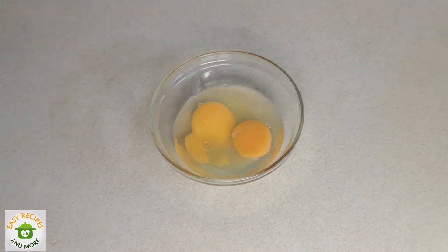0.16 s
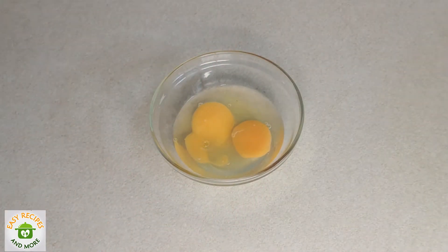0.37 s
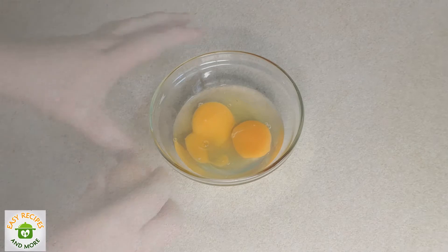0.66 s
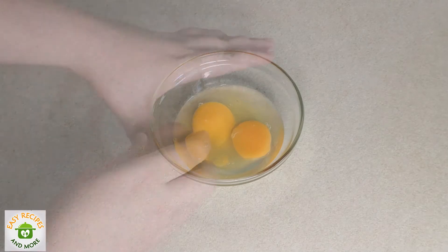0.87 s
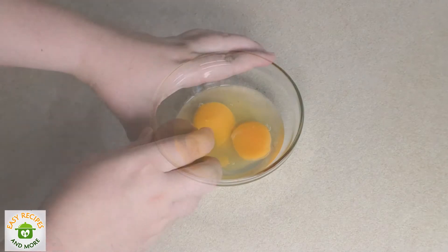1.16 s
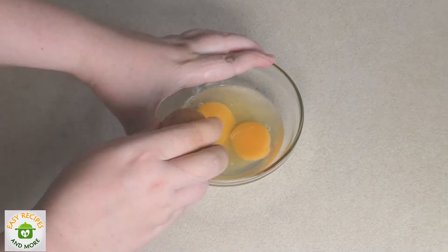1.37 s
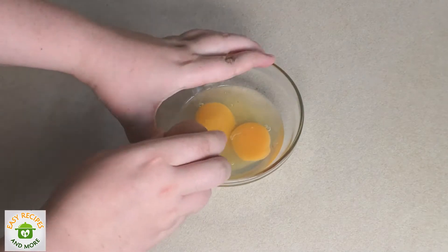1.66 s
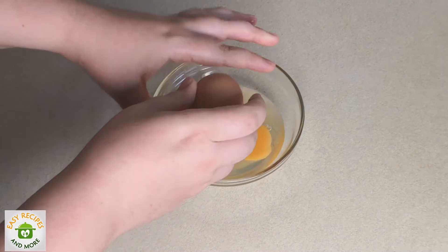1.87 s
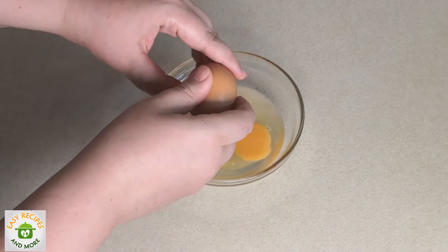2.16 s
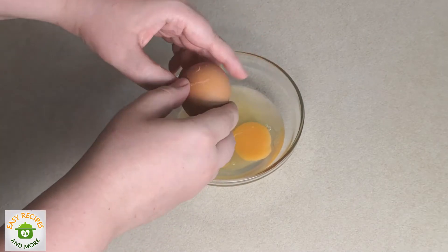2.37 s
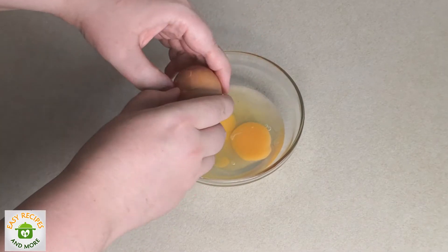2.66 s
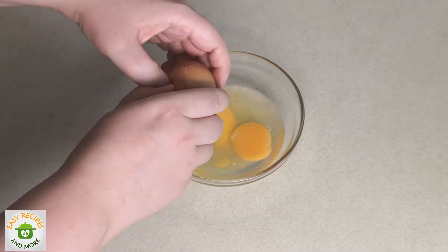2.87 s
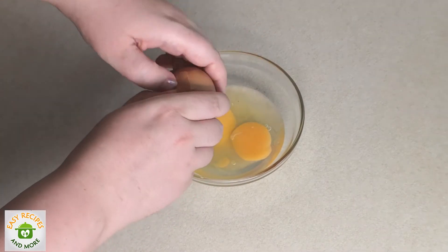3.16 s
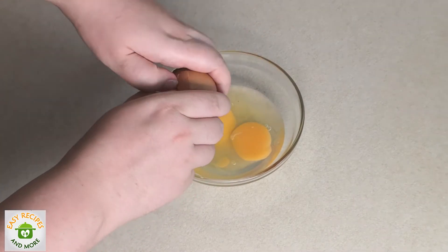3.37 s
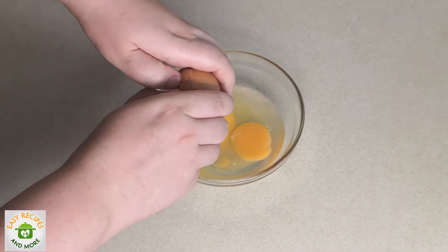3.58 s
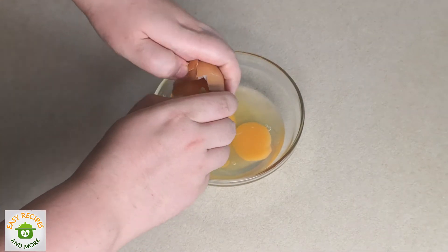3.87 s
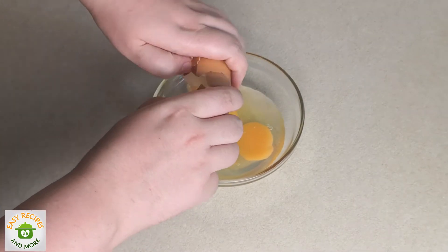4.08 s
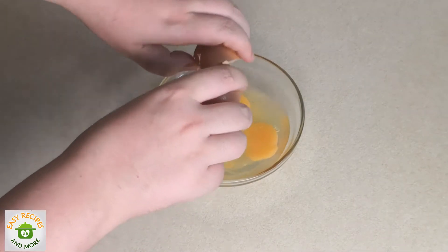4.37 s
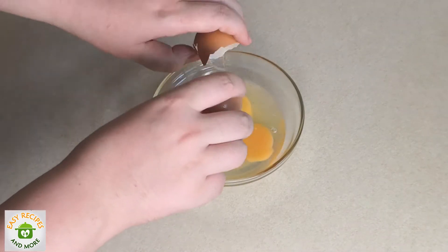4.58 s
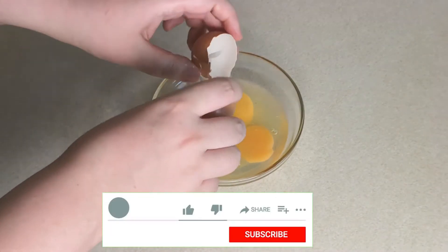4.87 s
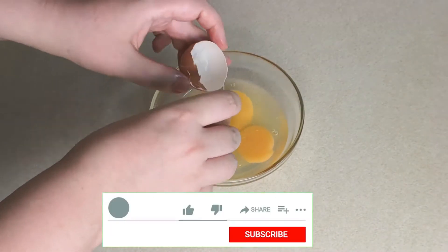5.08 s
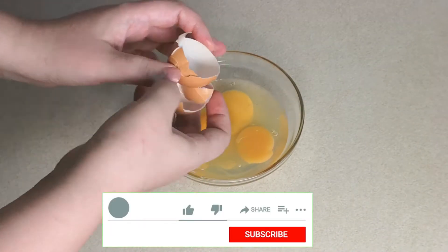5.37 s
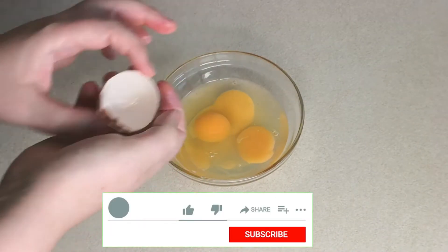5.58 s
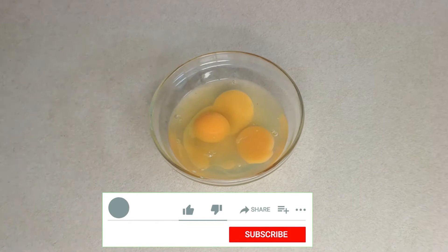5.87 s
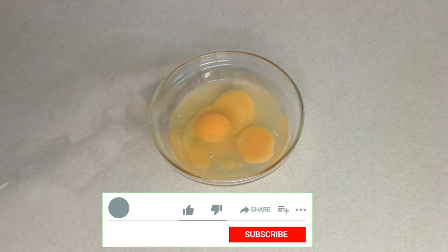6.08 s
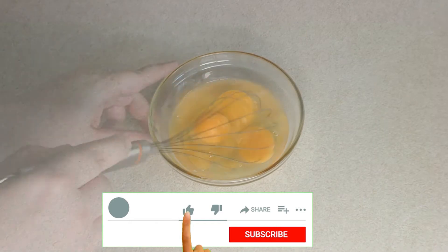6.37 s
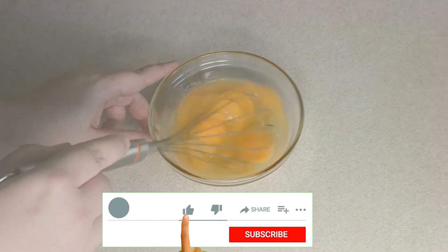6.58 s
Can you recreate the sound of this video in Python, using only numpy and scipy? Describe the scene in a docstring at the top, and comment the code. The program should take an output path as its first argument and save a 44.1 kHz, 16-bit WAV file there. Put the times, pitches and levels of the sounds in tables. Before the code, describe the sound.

Four hollow egg knocks ring a glass bowl in a small kitchen, then brittle shell snaps, a wet plop, and faint wire scrapes in egg.

```python
"""Fingers slide softly over shell and glass; then an egg is knocked four times on the rim of a glass bowl.
Each blow is noise of breaking shell, ringing rim modes, and a thud with a low shudder that soon breaks off.
Thumbs snap the shell open, its halves touch, wet egg crackles and slips, and a wire whisk starts through it.
Snaps excite shell resonances; sparse random clicks make rubs and wet crackle; rising sines make bubbles.
Two close microphone ports hear it in a small hard kitchen, over rumble, a low hum and faint hiss."""
import sys
import numpy as np
from scipy import signal
from scipy.fft import rfft, irfft
from scipy.io import wavfile
from scipy.ndimage import uniform_filter1d

SR = 44100
rng = np.random.default_rng(int(sys.argv[2]) if len(sys.argv) > 2 else 0)


def master(y):
    """Save y as 16-bit WAV."""
    cut = np.clip(np.atleast_2d(y).T, -1, 1)
    pcm = np.round(cut * 32767)  # scale
    wavfile.write(sys.argv[1], SR, pcm.astype(np.int16))


N = 297234
T = np.arange(N) / SR
AGE = T[:SR]  # s since an event began; every event is one second long
FREQ = np.arange(SR // 2 + 1) + 1e-3  # Hz, kept off zero for the logarithm

# egg on the rim; the dB columns are reference levels for the parts of each blow:
# start_s, knock_db, thud_db, crunch_db, rim_1_db, rim_2_db, rim_3_db, hollow_db, give_way_s
BLOWS = [(1.028, -23, -34.5, -61, -44.5, -49.5, -63.5, -32, 0.011),
         (1.367, -12, -30, -29.5, -28, -34, -31.5, -21, 0.0043),
         (1.539, -19.5, -31, -24.5, -33, -32, -35.5, -39, 0.0035),
         (1.705, -31, -30, -28.5, -34.5, -40, -30.5, -46, 0.0023)]
# rim modes of the glass, each a close pair: pitch_hz, split_hz, t60_s, level_db
RIM_MODES = [(2075, 40, 0.67, -10), (3730, 85, 0.12, -5.5), (5774, 70, 0.27, -12.5)]
# resonances heard in the body of the knock, coloured by the room:
# pitch_hz, level_db, t60_s (held to 0.45 s at most)
KNOCK_BODY = [(253, -27.5, 0.54), (553, -52.5, 5.0), (702.4, -27.5, 0.42), (885, -24, 0.54),
              (1071, -25.5, 0.73), (1120, -19.5, 0.054), (1155, -11, 0.33), (1248, -30.5, 0.63),
              (1386, -2.5, 0.067), (1510, -25, 0.091), (1450, -35, 0.85), (1690, -18.5, 0.26),
              (1770, -37, 0.7), (1980, -18.5, 0.11), (1998, -31, 0.51), (2090, -38.5, 2.3),
              (2070, -41.5, 1.3), (2150, -34.5, 0.31)]
# dent in the eggshell, which booms under each blow: pitch_hz, t60_s, level_db
DENT_MODES = [(1285, 0.023, 0.5), (980, 0.0064, -9.5)]
# colour of the egg's knock: pitch_hz, level_db
KNOCK = [(150, -2.5), (280, -4.5), (400, -9), (490, -1.5), (560, -1.5), (700, -2), (800, 3), (930, 4.5),
         (1200, -0.5), (1580, 0), (1950, -2), (2400, 0.5), (3000, -11.5), (4500, -17), (8000, -28),
         (13000, -68.5)]
# colour of the thud on the counter: pitch_hz, level_db
THUD = [(30, -50.5), (48, -33), (64, -18), (80, -18), (102, 7.5), (135, 3), (175, -15), (215, -8.5),
        (300, -16.5), (600, -28.5), (4000, -79.5)]
# colour of the crunching shell: pitch_hz, level_db
CRUNCH = [(150, -44.5), (800, -24.5), (2500, 0), (4500, -4), (6400, -4.5), (7400, 0.5), (9300, -8.5),
          (11000, -21), (14500, -28.5)]
BODY_DB, SHUDDER_DB = -13, 3.5  # body relative to knock_db, shudder relative to thud_db


def blows():
    """The shell caves in on the rim and the glass rings; a low shudder follows and soon breaks off."""
    out = np.zeros(N)
    for start_s, knock_db, thud_db, crunch_db, *rim_db, hollow_db, rise_s in BLOWS:
        push = crush(rise_s, t60=0.04)
        sound = hit(colour(push, KNOCK), knock_db - 4.0)
        for hz, t60, db in DENT_MODES:
            sound += hit(resonance(push, hz, t60), hollow_db + db)
        sound += hit(colour(crush(rise_s / 2, t60=0.027), CRUNCH), crunch_db)
        sound += hit(colour(fracture(t60=.04, trail=.4), THUD), thud_db)
        sound += hit(shudder(), thud_db + SHUDDER_DB)

        # the modes gather their energy while the egg is pushing
        swell = 1 - np.exp(-AGE / max(rise_s / 2, 1e-4))
        body = np.zeros(SR)
        for hz, db, t60 in KNOCK_BODY:
            polarity = rng.choice([-1, 1])
            body += polarity * undb(db) * ring(AGE == 0, hz, min(t60, .45))
        sound += hit(body * swell, knock_db + BODY_DB)

        for (hz, split_hz, t60, db), struck_db in zip(RIM_MODES, rim_db):
            pair = ring(AGE == 0, hz, t60) + .8 * ring(AGE == 0, hz + split_hz, t60)
            sound += hit(pair * swell, struck_db + db)
            # the egg pressed on the rim chokes the first flash of each mode
            flash = resonance(push, hz + split_hz / 2, .01)
            sound += hit(flash, struck_db + 3)
        add(out, start_s, sound)
    # so small a body radiates almost no deep bass
    return signal.sosfilt(signal.butter(6, 62, "high", fs=SR, output="sos"), out)


# low resonances after a blow: pitch_hz, t60_s (rattle; the free ring gets twice this), level_db
SHUDDER = [(100, .25, 0), (128, .1, -7), (160, .08, -9), (217, .12, -11), (270, .06, -12)]
# the low rumble after a blow fades slowly, then drops away quickly
SHUDDER_T60_S, SHUDDER_DROP_S = .38, .14
RATTLE_DB = 2  # uneven rattle, relative to the low ring


def shudder():
    """A low ring and an uneven rattle, which break off together."""
    noise = rng.standard_normal(2 * SR)
    fade = undb(-60 * AGE / SHUDDER_T60_S) / (1 + (AGE / SHUDDER_DROP_S) ** 20)
    out = np.zeros(SR)
    for hz, t60, db in SHUDDER:
        out += hit(ring(AGE == 0, hz, 2 * t60) * fade, db)
        rattle = resonance(noise, hz, t60)[SR:]  # the first second only builds it up
        out += hit(rattle * fade, db + RATTLE_DB)
    return out


# shell snapping under the thumbs; shard_db is the reference for snap, shard and splinters:
# start_s, cavity_db, cavity_hz, shard_hz, shard_db
CRACKS = [(2.635, -68, 2165, 7540, -58), (3.383, -85, 2070, 6820, -54.5), (3.523, -71, 2510, 4060, -58.5),
          (3.537, -76, 2350, 4130, -59), (3.7194, -61, 2780, 7000, -58.5), (3.812, -62, 2780, 4280, -49),
          (3.846, -25.5, 2300, 7800, -41.5), (3.8668, -26, 2200, 7450, -32), (3.876, -33, 2330, 7200, -78),
          (3.892, -35.5, 2360, 7000, -52), (4.0677, -43.5, 2010, 4940, -46),
          (4.105, -56.5, 2200, 7460, -51), (4.119, -49.5, 2180, 7830, -52.5),
          (4.1441, -41, 2274, 6860, -68), (4.174, -56, 1840, 7100, -55.5), (4.2275, -74, 2250, 6760, -59),
          (4.372, -62.5, 2670, 6650, -57), (4.597, -61, 2500, 6400, -62), (4.6034, -47, 2334, 7000, -47.5),
          (4.6289, -49.5, 2840, 7300, -49.5), (4.6643, -42.5, 2890, 5680, -25)]
# emptied half shells touching: start_s, cavity_db, shard_db
TAPS = [(4.948, -67, -71), (4.968, -68, -75), (5.263, -65.5, -78), (5.4474, -37, -51.5), (5.505, -67, -52),
        (5.742, -62.5, -76), (5.775, -60.5, -74)]
TAP_CAVITY_HZ, TAP_SHARD_HZ = 2300, 5670
CRACK_RING_DB, TAP_RING_DB = -12.5, 2.5  # clear ring of the shell, relative to its cavity
CRACK_TRAIL, TAP_TRAIL = 0.71, 0.4  # small breaks after the first one, as a share of it


def cracks():
    """The shell breaks open piece by piece; then its empty halves touch, always at the same pitch."""
    out = np.zeros(N)
    for start_s, cavity_db, cavity_hz, shard_hz, shard_db in CRACKS:
        add(out, start_s, shell(cavity_db, cavity_hz, shard_db, shard_hz, CRACK_RING_DB, CRACK_TRAIL))
    for start_s, cavity_db, shard_db in TAPS:
        add(out, start_s, shell(cavity_db, TAP_CAVITY_HZ, shard_db, TAP_SHARD_HZ, TAP_RING_DB, TAP_TRAIL))
    return out


# colour of the hollow half shell: multiple_of_cavity_hz, level_db
CAVITY = [(.1, -83), (.25, -14), (0.452, -21), (.7, -6.5), (0.898, 9.5), (1.069, 10), (1.248, 3),
          (1.6, -5.5), (2.398, -48.5), (5, -63.5)]
# bright snap of shell, also the colour of fine scratches, spray and wires: pitch_hz, level_db
SNAP = [(60, -31.5), (200, -13.5), (800, -39), (1600, -11), (3000, -1), (4200, 1.5), (6000, 3), (7400, 8),
        (9500, 0.5), (11500, -11), (14500, -26)]
SHELL_SPLIT, SHELL_T60_S = 0.063, .013  # the uneven cup has two modes, this share below and above its pitch


def shell(cavity_db, cavity_hz, shard_db, shard_hz, ring_db, trail):
    """A snap rings the hollow half shell and the loose shard; shards of higher pitch snap brighter."""
    snap = fracture(t60=0.036, trail=trail)
    brightness = np.sqrt(shard_hz / 7000)
    snap_colour = [(brightness * hz, db) for hz, db in SNAP]
    cavity_colour = [(k * cavity_hz, db) for k, db in CAVITY]
    sound = hit(colour(snap, snap_colour), shard_db - 5.5)
    sound += hit(colour(snap, cavity_colour), cavity_db)
    cup = sum(resonance(snap, cavity_hz * (1 + side * SHELL_SPLIT), SHELL_T60_S) for side in (-1, 1))
    sound += hit(cup, cavity_db + ring_db)
    shard = resonance(snap, shard_hz, .004)
    sound += hit(shard, shard_db - 2.0)
    # splinters still held by the membrane tick on after the break
    splinters = grains(rate=250, spread_db=4) * undb(-60 * AGE / .3)
    return sound + hit(colour(splinters, SNAP), shard_db - 14.5)


# surges of egg, slipping out of the shell or pushed by the whisk:
# start_s, swell_s, squelch_db, spray_db, slosh_db
SURGES = [(3.863, 0.0075, -46.5, -40, -59), (3.91, 0.063, -65, -58.5, -81), (4.064, 0.0043, -82, -52, -73),
          (4.101, 0.041, -66.5, -60, -98), (6.41, 0.083, -86, -70.5, -89),
          (6.511, 0.0073, -59.5, -58.5, -81), (6.589, 0.041, -74, -57.5, -63),
          (6.635, 0.021, -64, -56, -71)]
# colour of the bursting films: pitch_hz, level_db
SQUELCH = [(300, -10.5), (700, -12.5), (1400, -15), (2200, -11), (4000, -9.5), (12000, -62)]
# colour of the moving bulk: pitch_hz, level_db
SLOSH = [(40, -28.5), (100, -9), (140, 1), (210, 10), (400, -22.5), (1000, -23), (8000, -56)]
# air pockets popping in the egg: start_s, level_db, pitch_hz (where the glide begins), t60_s
BUBBLES = [(4.078, -54, 1170, 0.04), (4.108, -56, 1250, 0.045), (4.135, -57, 1330, 0.04),
           (4.176, -60, 1400, .03), (4.197, -60, 1600, 0.035), (6.519, -54, 1450, 0.03),
           (6.595, -53, 1420, 0.025), (6.636, -51, 2800, .015), (6.663, -56, 1550, 0.019),
           (6.648, -52, 520, .04), (6.659, -52, 540, .04), (6.671, -55, 520, .03)]
SURGE_RELEASE_S, SURGE_RELEASE_PER_SWELL = 0.063, 0.83  # a slow surge also dies away slowly
SLOSH_LAG_S, SLOSH_RELEASE_S = 0.017, 0.34  # the bulk of the egg peaks later and fades more slowly


def liquid():
    """Sticky films burst in a fine crackle over a dull slosh; larger air pockets ring and rise in pitch."""
    out = np.zeros(N)
    for start_s, swell_s, squelch_db, spray_db, slosh_db in SURGES:
        films = grains(rate=1200, spread_db=3.5)
        drops = grains(rate=3000, spread_db=4)
        squelch = undb(squelch_db) * unit(colour(films, SQUELCH))
        spray = undb(spray_db) * unit(colour(drops, SNAP))
        release_s = SURGE_RELEASE_S + SURGE_RELEASE_PER_SWELL * swell_s
        add(out, start_s, (squelch + spray) * stroke(swell_s, release_s))
        slosh = undb(slosh_db) * unit(colour(rng.standard_normal(SR), SLOSH))
        add(out, start_s, slosh * stroke(swell_s + SLOSH_LAG_S, SLOSH_RELEASE_S))
    for start_s, db, hz, t60 in BUBBLES:
        rising_hz = hz * (1 + 0.2 * np.minimum(AGE / t60, 1))
        phase = 2 * np.pi * np.cumsum(rising_hz) / SR
        add(out, start_s, hit(np.sin(phase) * stroke(2 / hz, t60), db))
    return out


# whisk wires scraping on the glass: start_s, level_db (reference for ring and scrape), pitch_hz
WIRES = [(6.515, -52.5, 7250), (6.6134, -36.5, 5560), (6.626, -59, 5400), (6.684, -45, 4000)]


def whisk():
    """Wires skid briefly on the glass, choked at once by the egg."""
    out = np.zeros(N)
    for start_s, db, hz in WIRES:
        skid = crush(rise=0.0013, t60=0.0064)
        wire_ring = hit(resonance(skid, hz, 0.0032), db - 5.5)
        scrape = hit(colour(skid, SNAP), db - 15.5)
        add(out, start_s, wire_ring + scrape)
    return out


# fingers sliding on shell and glass, one stroke a row: start_s, swell_s, rub_db, scratch_db, rub_hz
RUBS = [(0.15, .025, -70, -77, 2100), (0.315, 0.033, -69.5, -66, 2090), (0.512, 0.17, -65.5, -74, 1516),
        (0.66, 0.041, -64, -67, 1566), (0.8, 0.064, -88.5, -74, 1837), (2.958, .025, -72, -70.5, 2200),
        (3.02, 0.043, -72.5, -83.5, 1250), (3.203, 0.0093, -65.5, -85, 1582),
        (3.339, 0.01, -78, -107, 1540), (5.53, 0.038, -75, -68, 2170), (5.73, 0.094, -73, -78, 2007),
        (5.97, 0.049, -68, -78, 1823)]
# colour of the dull rub: multiple_of_rub_hz, level_db
RUB = [(0.124, -43), (0.559, -24.5), (0.998, 1), (1.349, -4), (2.06, -18.5), (5.001, -34.5)]
RUB_RELEASE_S, RUB_RELEASE_PER_SWELL = 0.055, 1  # a slow stroke also lets go slowly


def fingers():
    """Skin catches and slips on the rough shell, stroke by stroke."""
    out = np.zeros(N)
    for start_s, swell_s, rub_db, scratch_db, rub_hz in RUBS:
        catches = grains(rate=3000, spread_db=3)
        scrapes = grains(rate=5000, spread_db=3)
        rub = undb(rub_db) * unit(colour(catches, [(k * rub_hz, db) for k, db in RUB]))
        scratch = undb(scratch_db) * unit(colour(scrapes, SNAP))
        release_s = RUB_RELEASE_S + RUB_RELEASE_PER_SWELL * swell_s
        add(out, start_s, (rub + scratch) * stroke(swell_s, release_s))
    return out


# decay of the room: pitch_hz, t60_s
ROOM_T60 = [(100, 0.38), (400, 0.55), (1500, 0.56), (6000, 0.46), (14000, 0.28)]


def kitchen(dry):
    """Direct sound, a quick scatter from bowl and counter, then the walls."""
    hz, spectra = diffuse(SR)
    centres = 62.5 * 2 ** np.arange(9)  # octave bands
    scatter = undb(-60 * AGE / .03) * (AGE > .0005)
    response = np.zeros((2, SR))
    for k, centre in enumerate(centres):
        weight = np.interp(np.log(hz + 1), np.log(centres), np.arange(len(centres)) == k)
        band = irfft(spectra * weight)
        late = undb(-60 * AGE / along(ROOM_T60, centre)) * np.clip(AGE / 0.019, 0, 1)
        wet_db = along([(100, 1.0), (500, 2.0), (2000, 0), (8000, 0.0)], centre)
        response += band * (undb(-30.5) * late + undb(-19.5) * scatter) * undb(wet_db)
    response[:, 0] += .8  # direct sound
    return signal.fftconvolve(dry[None], response, axes=1)[:, :N]


# colour of the rumble and hiss, relative: pitch_hz, level_db
AIR = [(15, -39), (25, -8.5), (48, -3.5), (102, -3), (129, -11.5), (160, -5), (271, -8.5), (301, -5.5),
       (436, -16), (525, -15), (1510, -20.5), (1780, -17), (5840, -27.5), (7220, -27), (14000, -44)]
# partials of the hum: pitch_hz, level_db
HUM = [(59.2, -80.5), (247.6, -75.5), (301.5, -77)]


def room_tone():
    """Low rumble, an appliance's wavering hum and faint hiss."""
    hz, spectra = diffuse(N)
    air = unit(irfft(spectra * undb(along(AIR, hz)), N)) * undb(-65.5)
    hum = 0
    for f, db in HUM:
        drift = .012 * np.cumsum(rng.standard_normal(N))  # wandering phase, radians
        hum = hum + undb(db) * np.sin(2 * np.pi * f * T + drift)
    return air + hum


# likeness of the two ports: pitch_hz, left_right_correlation
LIKENESS = [(60, 0.99), (110, 0.95), (160, 1), (290, 0.58), (600, -0.55), (1400, 0.13), (3000, -0.088)]


def diffuse(count):
    """Spectra of noise from all sides at the two ports, alike in the bass."""
    hz = np.fft.rfftfreq(count, 1 / SR)
    mid, side = np.exp(2j * np.pi * rng.random((2, len(hz))))
    c = np.clip(along(LIKENESS, hz), -1, 1)
    opposite = np.array([[1], [-1]])
    return hz, np.sqrt(count / 2) * (mid * np.sqrt(1 + c) + opposite * side * np.sqrt(1 - c))


def fracture(t60, trail):
    """A first break and a dying trail of smaller ones."""
    # cubed noise is mostly quiet with a few strong spikes
    x = trail * hit(rng.standard_normal(SR) ** 3 * undb(-60 * AGE / t60), 0)
    return even(x + hit(AGE == 0, 0))


def crush(rise, t60):
    """Countless small breaks that build up as the shell gives way."""
    return even(rng.standard_normal(SR) * np.minimum(AGE / max(rise, 1e-4), 1) * undb(-60 * AGE / t60))


def grains(rate, spread_db):
    """One second of tiny random clicks of very unequal size, at this mean rate per second."""
    size = undb(spread_db * np.minimum(rng.exponential(size=SR), np.pi))
    return (rng.random(SR) < rate / SR) * size * rng.standard_normal(SR)


def stroke(swell, t60):
    """Gain of one movement: it builds up evenly, then dies away."""
    return np.minimum(AGE / max(swell, 1e-4), 1) * undb(-60 * np.maximum(AGE - swell, 0) / t60)


def ring(x, hz, t60):
    """One decaying mode, as a complex one-pole filter."""
    pole = np.exp((2j * np.pi * min(hz, SR / 2) - np.log(1000) / max(t60, 1e-4)) / SR)
    return signal.lfilter([1], [1, -pole], x).imag


def resonance(x, hz, t60):
    """A mode applied twice, the second time decaying faster, so that its skirts fall steeply."""
    return ring(ring(x, hz, t60), hz, t60 / 2)


def colour(x, points):
    """Causal filter with the given (Hz, dB) outline."""
    # folding the cepstrum onto positive time makes the filter minimum-phase
    cepstrum = irfft(along(points, FREQ) * np.log(10) / 20)
    cepstrum[1:SR // 2] *= 2
    cepstrum[SR // 2:] = 0
    response = irfft(np.exp(rfft(cepstrum)))[:SR // 10]
    return signal.fftconvolve(x, response)[:len(x)]


def even(x):
    """Smooth away the broad humps of a burst's spectrum."""
    spectrum = rfft(x)
    power = uniform_filter1d(abs(spectrum) ** 2, size=400)
    return irfft(spectrum / np.sqrt(power)) * (AGE < .5)


def along(points, hz):
    """Read (Hz, value) points on a log-frequency axis."""
    f, value = np.transpose(points)
    return np.interp(np.log(hz + 1), np.log(f), value)


def undb(db):
    """Amplitude gain of a level in dB."""
    return 10 ** (np.asarray(db) / 20)


def hit(x, db):
    """Give a sound the energy of 5 ms at this level."""
    return x * undb(db) * np.sqrt(SR / 200 / np.sum(x ** 2))


def unit(x):
    """Scale a sound to a standard deviation of one."""
    return x / np.std(x)


def add(track, start_s, x):
    """Mix a sound into the track, cut off at the track's end."""
    start = int(start_s * SR)
    track[start:start + len(x)] += x[:N - start]


def scene():
    """Egg, bowl, fingers and whisk in the kitchen, over its room tone."""
    return kitchen(blows() + cracks() + fingers() + liquid() + whisk()) + room_tone()


# treble resonances of the two microphone ports: pitch_hz, left_minus_right_db
PORTS = [(300, 0), (1000, 1.5), (5500, 1), (7400, 6), (8400, -1), (9500, -7), (13000, 0.5)]
TOP_HZ = 14300


def record(dry):
    """Each microphone port has its own treble resonance; the top is cut."""
    lean_db = along(PORTS, np.fft.rfftfreq(N, 1 / SR))
    heard = irfft(rfft(dry) * undb(np.array([lean_db, -lean_db]) / 2), N)
    return signal.sosfilt(signal.ellip(8, .2, 70, TOP_HZ, fs=SR, output="sos"), heard)


dry = scene()
out = record(dry)
master(out)
```